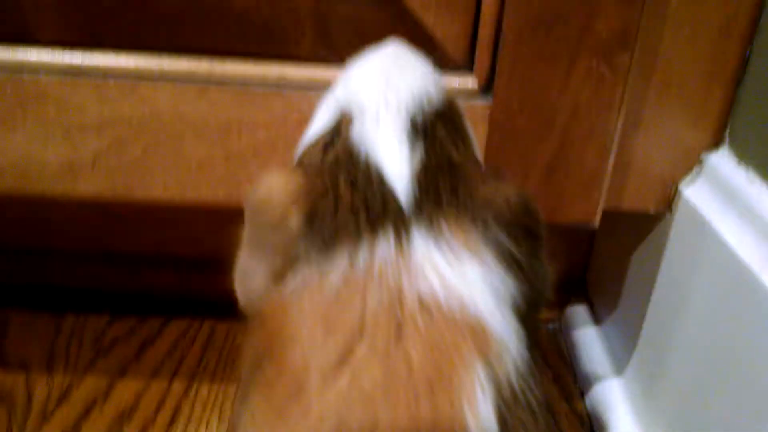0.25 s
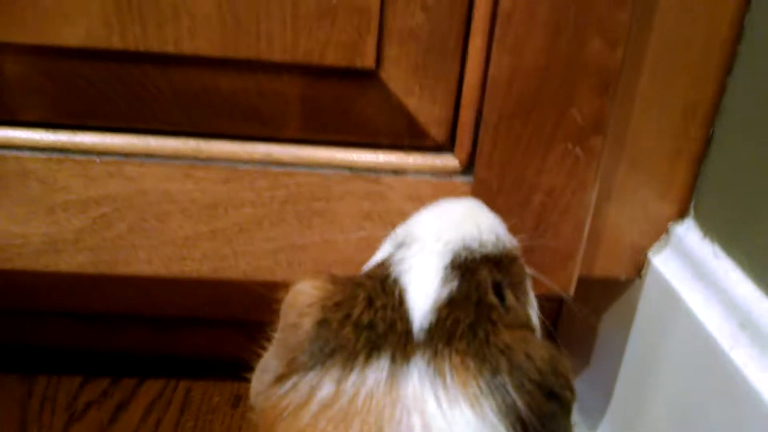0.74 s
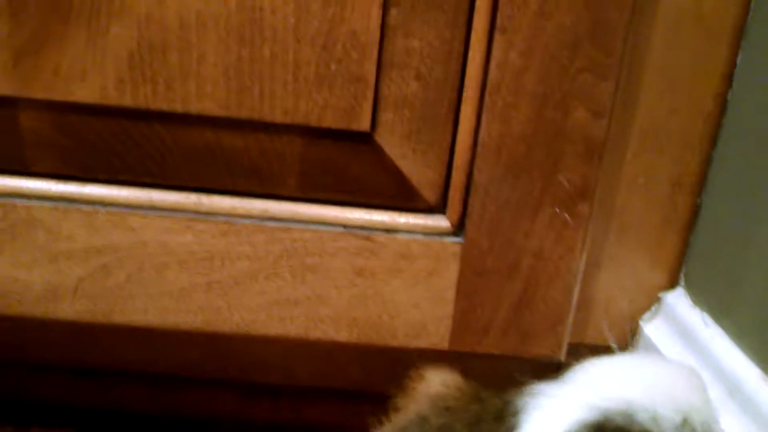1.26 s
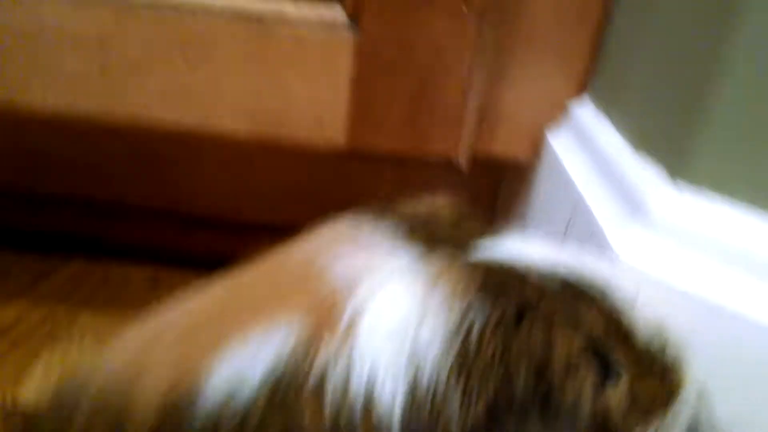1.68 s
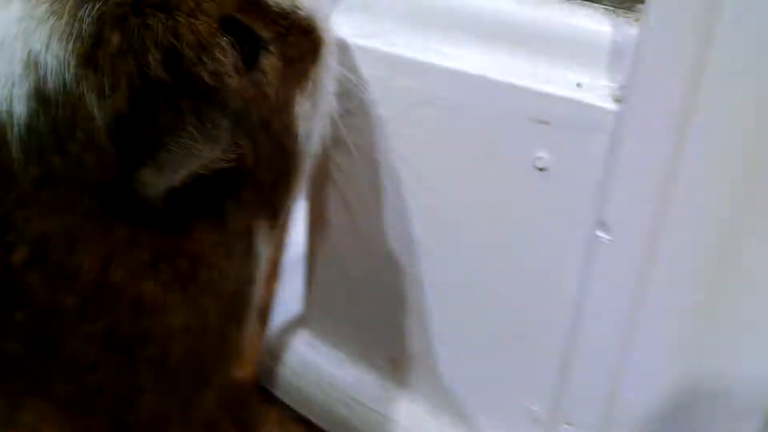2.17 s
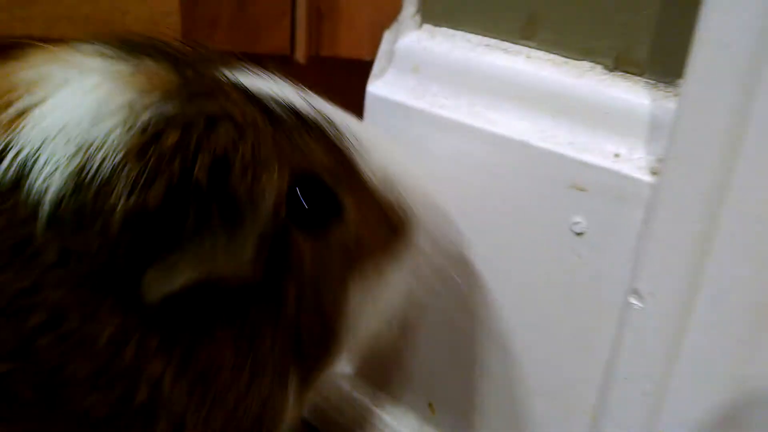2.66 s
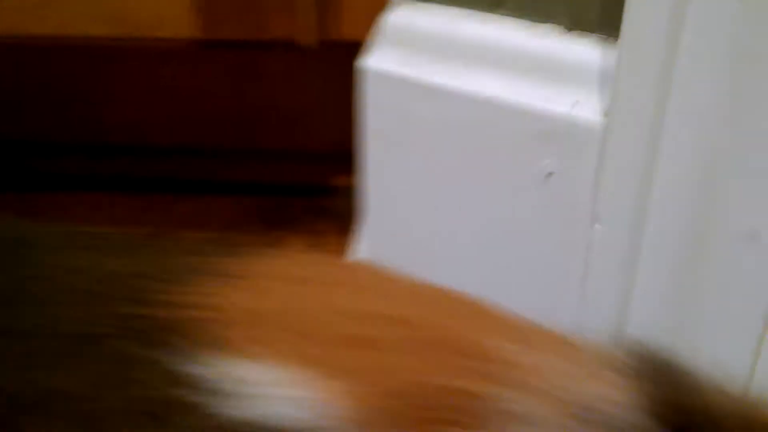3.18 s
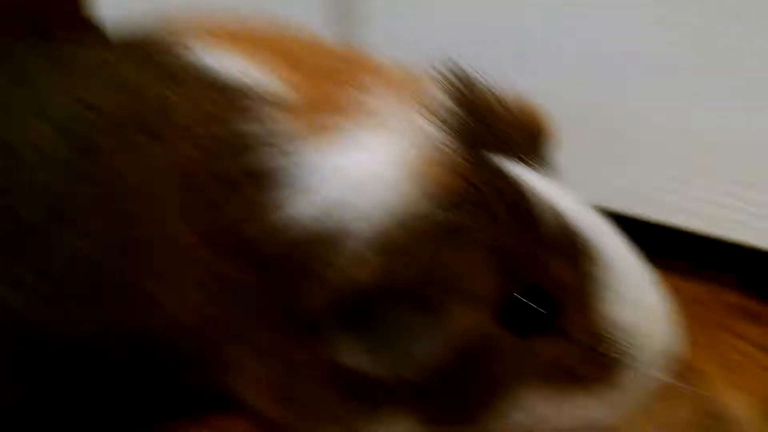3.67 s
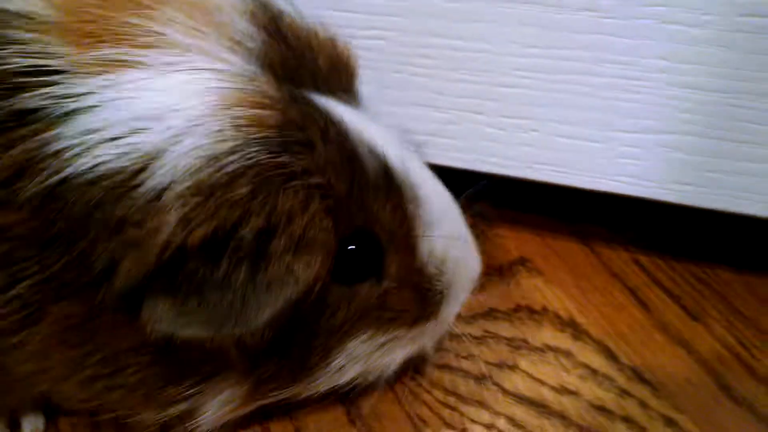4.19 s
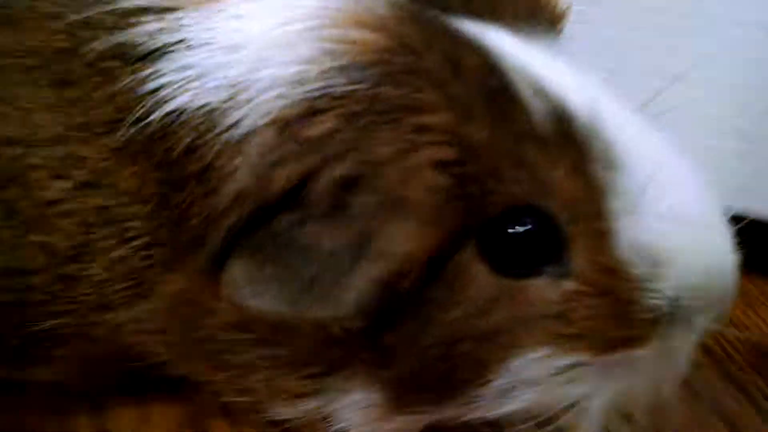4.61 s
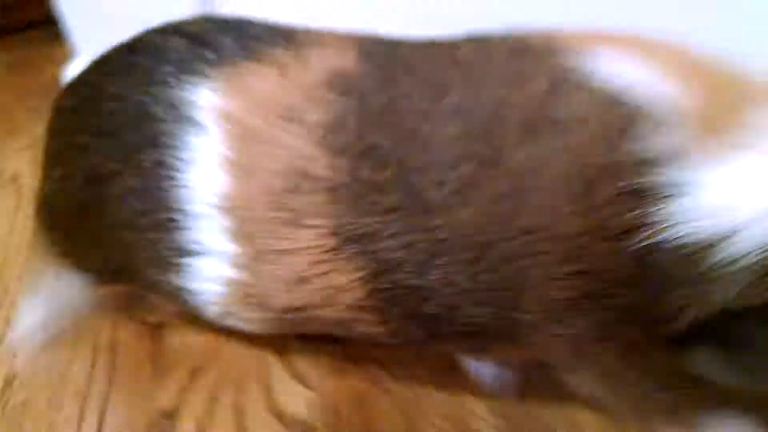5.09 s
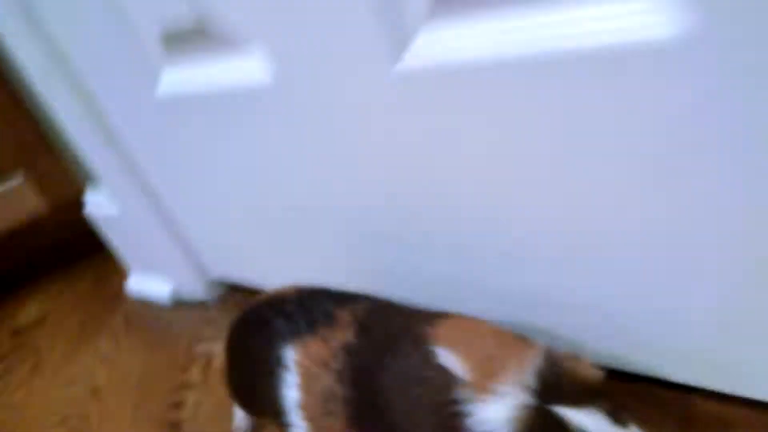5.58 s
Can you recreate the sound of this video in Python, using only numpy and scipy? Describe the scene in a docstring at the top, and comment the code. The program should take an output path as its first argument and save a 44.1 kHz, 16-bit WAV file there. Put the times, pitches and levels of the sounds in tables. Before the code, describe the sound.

A guinea pig noses about a kitchen corner, heard close on a handheld microphone. Over a low refrigerator hum and faint hiss come isolated claw ticks and three tiny squeaks, then a flurry of light scratches with a fourth, stronger squeak. After sparse clicks it trots away, claws pattering, feet thudding softly and fur brushing the door.

```python
"""A guinea pig noses about a kitchen corner, squeaks four times and trots off over the wooden floor.
Claws are ticks of ringing noise, feet damped swings, paws and coat scratchy noise, the door close to the microphones.
Each squeak is a gliding tone with two overtones and a rasp.
A refrigerator hums in the quiet room: unsteady motor orders, a rush of air and a moving hollow resonance."""
import sys
import numpy as np
from scipy import signal
from scipy.fft import rfft, irfft
from scipy.io import wavfile

SR = 44100
rng = np.random.default_rng(int(sys.argv[2]) if len(sys.argv) > 2 else 0)


def output_pcm(signal):
    """Save a mono or channel-first signal as 16-bit PCM at the path in sys.argv[1].

    Samples are clipped to [-1, 1] before scaling.
    """
    pcm = np.clip(np.atleast_2d(signal).T, -1, 1) * 32767
    wavfile.write(sys.argv[1], SR, np.round(pcm).astype(np.int16))


N = 257984

# the clearest claw ticks, before the common claw gain:
# (time [s], level [dB], decay [ms], tilt [dB per octave above 1200 Hz], ringing pitch [Hz])
CLAW_TICKS = [ (0.166, -43.5, 2.3, -8, 1500), (0.465, -30.5, 0.54, -7, 2560), (0.47, -43, 0.52, -20, 2190),
              (1.093, -57, 1.5, 2, 7500), (1.7466, -36, 0.76, -4, 1070), (1.75, -33, 0.6, -1, 1100),
              (1.7516, -42, 2.3, 2, 6500), (2.953, -44, 2.4, -2, 7000), (2.961, -46, 1.2, -6, 4000),
              (3.012, -32, 1.15, 0.5, 4120), (3.018, -46, 1.3, 0, 4500), (3.103, -48, 1.2, -6, 4400),
              (3.118, -45, 1.5, -6, 5200), (3.127, -48, 1.5, 0, 6000), (3.158, -50, 1.2, 0, 5400),
              (3.168, -45, 1.7, 1, 5030), (3.182, -41.5, 1.4, 5, 5160), (3.198, -46, .8, -2, 5200),
              (3.2775, -32, 1.2, -1, 13100), (3.317, -42, 1.5, 1, 6300), (3.34, -42, 2, -2, 6060),
              (3.348, -45, 1.5, 1, 8200), (3.365, -46, .8, 0, 8000), (3.3935, -44, 0.83, 0, 9000),
              (3.3884, -45, 2.4, -2.5, 8500), (4.01, -39.5, 2.4, 0.5, 5850),
              (4.1555, -31.5, 1.8, -1.5, 5000), (4.1584, -37, 1.4, -2, 5300),
              (4.2611, -37.5, 1.34, 0, 4150), (4.426, -46, 3.8, 5, 4340), (4.4727, -39, 1.8, -5.5, 11900),
              (4.493, -40, 4, 3, 4200), (4.4986, -31.5, 3.1, -4, 4170), (4.501, -30, 2.2, -2.5, 4180),
              (4.508, -34, 1.1, 0, 5240), (4.5105, -33.5, 4.7, 1, 4200), (4.615, -30, 0.78, -0.5, 9400),
              (4.631, -38, 0.67, -4, 6600), (4.742, -45, 1.2, -8, 4500), (4.753, -43, 1.5, -9, 5500),
              (4.761, -42, 1.5, 1, 5000), (4.8357, -36, 1.2, 2, 5700), (4.988, -30, 1.8, 0.5, 6700),
              (5.1772, -39.5, 0.91, -8, 1500), (5.2142, -28, 2.2, -6, 2440), (5.223, -35.5, 3.6, 3, 4200),
              (5.238, -37, .8, -4, 9000), (5.2563, -37, 2, 0, 8140), (5.278, -35, 1.2, -6.5, 1190),
              (5.321, -39, 1.1, -17, 1290), (5.327, -27.5, 2, 6, 5640), (5.353, -37, 2.5, 10, 12500),
              (5.402, -38, 3.3, 2, 5500), (5.51, -27, 0.8, -10, 1600), (5.5986, -25.5, 0.83, 1, 5570),
              (5.673, -35, 2.5, 18, 8050), (5.717, -38.5, 5.3, -3.5, 5530), (5.789, -39, 1.5, 12, 11800),
              (5.822, -24, 1.0, 2, 4650)]
# the coat sliding along the door: (time [s], level [dB])
COAT_LEVEL = [(0, -63), (2.9, -63.5), (3.2, -58.5), (3.5, -60.5), (4.4, -59), (4.8, -49), (5.17, -49),
              (5.42, -39), (5.62, -46.5), (5.85, -45.5)]
EDGE_HZ = 15750  # upper edge of the recorder's band


def amp(db):
    """Decibels to a linear gain."""
    return 10 ** (np.asarray(db) / 20)


def evened(x):
    """The sound scaled to an RMS of one."""
    return x / np.sqrt(np.mean(x ** 2) + 1e-20)


def read(points, hz):
    """A table of (frequency [Hz], value) joined on a log-frequency axis."""
    f, value = np.transpose(points)
    return np.interp(np.log(hz + 1), np.log(f + 1), value)


def curve(rows):
    """Rows of (time [s], value) joined by straight lines."""
    return np.interp(np.arange(N) / SR, *np.transpose(rows))


def add(mix, s, sound):
    """Lay a sound into the mix at s seconds, cut off at the end."""
    part = mix[:, round(s * SR):][:, :sound.shape[-1]]
    part += sound[..., :part.shape[1]]


def pan(db):
    """Left and right gains for a left-minus-right level difference."""
    return amp(np.array([[.5], [-.5]]) * db)


def hump(hz, centre_hz, octaves):
    """A bell on the log-frequency axis."""
    return np.exp(-.5 * (np.log2((hz + 1) / centre_hz) / octaves) ** 2)


def drift(rate):
    """Slow random wander of unit RMS, mostly below rate [Hz]."""
    hz = np.fft.rfftfreq(N, 1 / SR)
    spectrum = rfft(rng.standard_normal(N)) * np.exp(-(hz / rate) ** 2)
    spectrum[0] = 0
    return evened(irfft(spectrum, N))


def spread(pair):
    """Two unrelated signals become left and right spectra, by turns more and less alike up the treble."""
    # likeness of the two microphones: (frequency [Hz], correlation)
    likeness = [(60, 0.85), (130, 0.62), (300, 0.96), (550, 0.53), (800, 0.37), (1500, 0.52), (2300, 0.028)]
    # depth of the ripple in that likeness: (frequency [Hz], depth)
    widening = [(500, 0.22), (1100, 0.5), (1500, 0.58), (3100, 1), (4600, 0.72), (9300, 0.41),
                (12400, 0.93), (14000, 0.62)]
    crossfeed_s, left_lead_s = .000325, .000033
    hz = np.fft.rfftfreq(pair.shape[1], 1 / SR)
    right, other = rfft(pair)
    ripple = read(widening, hz) * np.cos(2 * np.pi * hz * crossfeed_s)
    same = np.clip(read(likeness, hz) - ripple, -1, 1)
    left = same * right + np.sqrt(1 - same ** 2) * other
    left = left * np.exp(2j * np.pi * hz * left_lead_s)
    return np.array([left, right])


def noise(size, colour):
    """Coloured noise at the two microphones."""
    spectra = spread(rng.standard_normal((2, size)))
    return evened(irfft(spectra * colour(np.fft.rfftfreq(size, 1 / SR)), size))


def crackle(size, per_s, strength, decay):
    """A steady level broken by tiny snaps at random moments, each dying away over decay [s]."""
    snaps = (rng.random(size) < per_s / SR) * np.minimum(rng.exponential(1, size), 3)
    tails = signal.lfilter([1], [1, -np.exp(-1 / (decay * SR))], snaps)
    return evened(1 + strength * tails)


def resonate(x, hz, width_hz):
    """A resonance that follows the curve hz: shift down to zero, smooth twice, shift back."""
    turn = np.exp(2j * np.pi * np.cumsum(hz) / SR)
    r = np.exp(-np.pi * width_hz / SR)
    smoothed = signal.lfilter([1], np.poly([r, r]), x / turn)
    return evened((turn * smoothed).real)


def motor(hz, orders, slip, waver, left_phase):
    """Orders of a slightly unsteady shaft; the higher ones waver more and differ more between the microphones."""
    phase = 2 * np.pi * np.cumsum(hz * (1 + slip * drift(1.78))) / SR
    offset = np.array([[left_phase], [0]])  # radians at left and right
    tone = np.zeros((2, N))
    for order, db in orders:
        order = round(order)
        depth = waver * np.log2(order + 1)
        path = 1 + depth * np.array([drift(4.8) + 1j * drift(4.3) for _ in range(2)])
        turn = np.exp(1j * (order * phase + rng.uniform(0, 2 * np.pi) + offset))
        tone += amp(db) * (path * turn).real / np.sqrt(.5 + depth ** 2)
    return tone


def refrigerator(air_db=-52.5, air_follows=0.27, fan_follows=2.08, air_waver_db=0.5, left_phase=1.28):
    """Two motors and a lone tone in a rush of air, louder as the microphones come nearer."""
    # motor orders before nearness and pan: (order [multiple of the shaft rate], level [dB])
    compressor_orders = [(1, -52), (4, -63.5), (5, -63), (6, -62), (8, -71)]
    fan_orders = [(1, -64.5), (2, -62.5), (3, -62.5), (4, -56.5), (5, -63.5), (8, -61.5), (10, -62.5)]
    # nearness to the refrigerator: (time [s], gain [dB])
    nearness = [(0, 1), (1, -1.5), (2, 0.5), (2.8, -0.5), (3.6, 1.5), (5, 2), (5.85, 2.5)]
    # colour of the rushing air: (frequency [Hz], gain [dB])
    air_colour = [(20, -8), (42, -26), (75, -13), (105, 4), (140, -7), (200, -0.5), (320, -3.5), (420, -7),
                  (540, -8), (700, -10.5), (1000, -15), (2000, -25), (2800, -26.5), (4500, -64)]
    # hollow resonance that the corner gives the drone, shifting as the microphones move:
    # (time [s], level before pan [dB], centre [Hz])
    hollow_path = [(0, -66, 377), (1.7, -62.5, 420), (2.1, -52, 480), (2.8, -54.5, 500), (3.7, -50.5, 312),
                   (4.9, -48.5, 236), (5.85, -58.5, 204)]
    compressor_hz, fan_hz, buzz_hz = 59.2, 52.95, 323.6
    buzz_db = -56  # before nearness and pan

    near_db = curve(nearness)
    hum = motor(compressor_hz, compressor_orders, slip=0.0025, waver=0.13, left_phase=left_phase)
    hum += motor(buzz_hz, [(1, buzz_db)], slip=0.0041, waver=1.0, left_phase=left_phase)
    fan = motor(fan_hz, fan_orders, slip=0.00435, waver=0.17, left_phase=left_phase)
    fan = amp(fan_follows * near_db) * fan  # follows: dB per dB of nearness
    air_level_db = air_db + air_follows * near_db + air_waver_db * drift(1.7)
    air = amp(air_level_db) * noise(N, lambda hz: amp(read(air_colour, hz)))
    hollow_db, hollow_hz = (curve(np.array(hollow_path)[:, [0, k]]) for k in (1, 2))
    murmur = noise(N, lambda hz: hump(hz, centre_hz=337, octaves=0.7))
    hollow = amp(hollow_db) * resonate(murmur, hollow_hz, width_hz=320)
    return pan(-2.86) * (amp(near_db) * hum + fan + air + hollow)


def hiss(db=-63.0):
    """The steady hiss of the microphones: coloured noise."""
    # colour of the hiss: (frequency [Hz], gain [dB])
    hiss_colour = [(500, -3), (1500, 7.5), (2400, 2.5), (4200, 2.5), (6500, -1.5), (9800, -2.5),
                   (10600, -8), (15300, -26)]
    return amp(db) * noise(N, lambda hz: amp(read(hiss_colour, hz)))


def handling(db=-60, centre_hz=36, octaves=0.33):
    """The hand-held microphones rumble as they swing round to follow the trot."""
    # (time [s], speed of the swing [0-1])
    swing_speed = [(0, 0.1), (5.3, 0.17), (5.55, 0.8), (5.85, 0.6)]
    return amp(db) * curve(swing_speed) * noise(N, lambda hz: hump(hz, centre_hz, octaves))


def rustle(grain_db=0.6, rough_db=1.5, count=6):
    """Fur hisses along the door, rough and unsteady, with tiny snaps."""
    # colour of the fur: (frequency [Hz], gain [dB])
    coat_colour = [(600, 3.5), (1500, -0.5), (2400, 0.5), (3100, -4.5), (4200, 2.5), (6500, 1), (9800, 1),
                   (13000, -1.5), (15500, -0.5)]
    snaps = crackle(N, per_s=90, strength=0.6, decay=0.0011)
    hz = np.fft.rfftfreq(N, 1 / SR)
    fur = rfft(noise(N, lambda hz: amp(read(coat_colour, hz))))
    place = np.minimum(hz / EDGE_HZ, 1) * (count - 1)
    rough = np.zeros((2, N))
    for k in range(count):
        band = irfft(fur * np.maximum(1 - abs(place - k), 0), N)  # overlapping triangular bands
        rough += band * amp(rough_db * drift(90))
    return amp(curve(COAT_LEVEL) + grain_db * drift(61)) * snaps * evened(rough)


def claw(s, db, decay_ms, tilt_db, ring_hz, ring_db=7, rise_ms=0.15, touch=0.036, size=2048):
    """A claw tip grazes the varnish, then snaps onto it: brief chatter with one stronger resonance."""
    # colour of claw on varnish: (frequency [Hz], gain [dB])
    varnish_colour = [(300, -58), (1000, -5), (1600, -1.5), (3000, 3.5), (4200, 8), (7000, 5.5), (10000, 6),
                      (14000, -0.5), (16000, -8.5)]
    lead = size // 8  # samples of grazing before the snap
    ms = (np.arange(size) - lead) * 1000 / SR
    after = np.maximum(ms, 0)
    hz = np.fft.rfftfreq(size, 1 / SR)
    snap = (1 - np.exp(-after / rise_ms)) * np.exp(-after / decay_ms)
    graze = touch * np.exp(-abs(ms) / 2.0)
    envelope = snap / snap.max() + graze
    chatter = spread(rng.standard_normal((2, size)) * envelope)
    tilt = tilt_db * np.log2(np.maximum(hz / 1200, 1))
    colour_db = read(varnish_colour, hz) + tilt + ring_db * hump(hz, ring_hz, 0.12)
    tick = evened(irfft(chatter * amp(colour_db), size))
    return s - lead / SR, amp(db) * tick * np.sqrt(np.mean(envelope ** 2))


def floor_echoes():
    """Rows of fainter ticks: the floor throws back each clear tick."""
    echo_db, decay_ms = -14, 0.51  # level against the clear tick
    lags = rng.uniform(0.0033, 0.0073, len(CLAW_TICKS))  # seconds
    return [(s + lag, db + echo_db, decay_ms, tilt_db, ring_hz)
            for (s, db, _, tilt_db, ring_hz), lag in zip(CLAW_TICKS, lags)]


def bump(s, db, decay, centre_hz, octaves):
    """A knock sets the woodwork ringing: a cluster of close panel resonances dies away."""
    t = np.arange(SR // 2) / SR
    ringing = noise(len(t), lambda hz: hump(hz, centre_hz, octaves))
    return s, amp(db) * ringing * np.exp(-t / decay) * (1 - np.exp(-t / 0.001))


def thud(s, db, hz, swell_s, pan_db):
    """A soft foot pushes a floorboard: a quick push gives a broad knock, a slow one a few round swings."""
    t = np.arange(SR // 5) / SR
    push = (t / swell_s * np.exp(1 - t / swell_s)) ** 2
    return s, -amp(db) * pan(pan_db) * push * np.sin(2 * np.pi * hz * t)


def squeak(s, length, db, first_hz, top_hz, end_hz, glide_s, swell_db, catch_db, catch_s, release_s,
           overtones_db, tilt_db, pan_db, pop_db, rasp_db):
    """A brief note glides, then turns; hoarse until the pitch settles, its overtones fade first as it closes."""
    # resonances of the throat, applied to the overtones: (frequency [Hz], gain [dB])
    throat_colour = [(600, 0), (900, -5.5), (1400, -2.5), (2100, -11.5), (2350, -17), (2700, -12.5)]
    attack_s, pop_s, catch_width_s = 0.002, 0.003, 0.0025
    turn_at = 0.46  # share of the note before the last turn of pitch
    jitter, shimmer_db = .02, .4
    settled = .2  # hoarseness left once the glide is over
    t = np.arange(0, length, 1 / SR)
    progress = t / length

    glide = np.sin(np.pi / 2 * np.minimum(t / glide_s, 1)) ** 2
    turn = np.maximum((progress - turn_at) / (1 - turn_at), 0) ** 2
    hz = first_hz + (top_hz - first_hz) * glide + (end_hz - top_hz) * turn
    hoarse = 1 + (settled - 1) * glide
    phase = 2 * np.pi * np.cumsum(hz * (1 + jitter * hoarse * drift(300)[:len(t)])) / SR

    pop = pop_db * np.exp(-(t / pop_s - 1) ** 2)
    catch = catch_db * np.exp(-.5 * ((t - catch_s) / catch_width_s) ** 2)  # a brief dip
    gate = np.minimum(t / attack_s, 1) * np.minimum((length - t) / release_s, 1)
    shimmer = shimmer_db * drift(150)[:len(t)]
    effort = gate * amp(swell_db * (progress - .5) + pop - catch + shimmer)

    overtones = np.zeros(len(t))
    for k in (2, 3):
        overtone_db = read(throat_colour, k * hz) + overtones_db + tilt_db * (k - 2.0)
        overtones += amp(overtone_db) * np.sin(k * phase)
    breath = noise(len(t), lambda f: hump(f, centre_hz=950, octaves=1.0))
    rasp = amp(rasp_db) * hoarse * (1 + np.cos(phase)) * breath  # pulses with the note
    voice = np.sqrt(2) * (np.sin(phase) + gate * overtones) + rasp
    return s, amp(db) * effort * voice * pan(pan_db)


def scuff(s, length, db, centre_hz, octaves, grain_db=1.0, grain_hz=260, skirt=0.048):
    """Hairs and pads catch and slip: scratchy noise that swells and fades; a narrow band rings like the door."""
    size = int(length * SR)
    grain = amp(grain_db * drift(grain_hz)[:size])
    stroke = np.sqrt(np.hanning(size)) * grain * crackle(size, per_s=240, strength=0.65, decay=.0006)
    hz = np.fft.rfftfreq(size, 1 / SR)
    colour = hump(hz, centre_hz, octaves) + skirt * hump(hz, centre_hz, 3 * octaves)
    scratch = spread(stroke * rng.standard_normal((2, size)))
    return s, amp(db) * evened(irfft(scratch * colour, size))


def patter(count=34):
    """Rows of light, uneven claw ticks at random during the trot, at levels close to the coat's rustle."""
    start_s, end_s = 4.72, 5.84
    offset_db, spread_db = -1.5, 2.5  # against the rustle, before the common claw gain
    decay_ms, tilt_db = 1, -2
    chance = rng.random((count, 3))
    times = start_s + (end_s - start_s) * (np.arange(count) + chance[:, 0]) / count
    coat_db = np.interp(times, *np.transpose(COAT_LEVEL))
    levels = coat_db + offset_db + spread_db * (2 * chance[:, 1] - 1)
    rings = np.interp(chance[:, 2], [0, 1], [3800, 9500])  # Hz
    return [(s, db, decay_ms, tilt_db, hz) for s, db, hz in zip(times, levels, rings)]


def corner(x, near_db=-8.0, near_decay=0.023, room_db=-18, room_decay=0.041, dull_hz=2500):
    """Quick reflections from floor and cabinet, then the faint tail of the kitchen; both lose treble."""
    t = np.arange(SR // 2) / SR
    taps = rng.standard_normal((2, len(t))) * (t > .001)
    response = np.zeros((2, len(t)))
    for db, decay in ((near_db, near_decay), (room_db, room_decay)):
        tail = taps * np.exp(-t / decay)
        response += amp(db) * tail / np.linalg.norm(tail[0])
    response = signal.lfilter(*signal.butter(1, dull_hz, fs=SR), response)
    return signal.fftconvolve(x, response, axes=1)[:, :N]


def scene(claws_db=1):
    """The animal in its corner, over the sound of the room."""
    # bumps on the woodwork: (time [s], level [dB], decay [s], centre [Hz], width [octaves])
    bump_rows = [(0.465, -43, 0.0012, 1400, 0.44), (3.569, -38.5, 0.0031, 1200, 0.42),
                 (4.156, -47.5, 0.0085, 1760, 0.12), (4.5, -36, 0.009, 4100, 0.046),
                 (4.501, -40.5, 0.016, 1930, 0.19), (5.2144, -29, 0.004, 2300, 0.31),
                 (5.219, -42, 0.0059, 1200, 0.42), (5.222, -44, 0.023, 397, 0.36),
                 (5.218, -47, 0.12, 1200, 1), (5.328, -38, 0.0026, 1700, 0.99),
                 (5.345, -40.5, 0.045, 340, 0.39), (5.508, -29.5, 0.0014, 1520, 0.2),
                 (5.509, -27, 0.0023, 680, 0.2), (5.512, -40, 0.06, 1640, 0.45),
                 (5.518, -43, 0.038, 680, 0.23), (5.822, -33.5, 0.0029, 1740, 0.2)]
    # footfalls on the boards: (time [s], level [dB], pitch [Hz], swell [s], left minus right [dB])
    thud_rows = [(1.0936, -39.5, 1080, 0.00055, 0), (2.809, -36, 845, 0.00061, 0),
                 (2.861, -41, 950, .0008, 0), (2.944, -48, 1300, .0008, -2),
                 (3.1677, -30.5, 596, 0.00038, -1), (3.168, -38.5, 290, 0.0044, 4),
                 (3.568, -40, 700, .0006, -8), (3.877, -41, 91.5, .008, -9), (3.896, -42, 126, 0.0092, 4),
                 (5.2133, -29.5, 420, 0.0028, -15), (5.2983, -32, 286, 0.0011, -14),
                 (5.303, -37, 240, .008, 3), (5.3481, -27.5, 336, 0.0018, -12),
                 (5.3549, -27.5, 233, 0.0061, 4), (5.3735, -32, 380, 0.0025, -12),
                 (5.376, -36, 200, 0.0075, -8), (5.385, -33, 86, 0.009, -3), (5.403, -37, 170, .002, -6),
                 (5.528, -50, 152, 0.006, -3), (5.645, -59, 150, 0.0051, -3), (5.784, -48, 162, 0.0089, -3),
                 (5.815, -48, 150, 0.0089, -3)]
    # squeaks: (time [s], length [s], level [dB], first pitch [Hz], top pitch [Hz], last pitch [Hz],
    # glide [s], swell [dB], catch depth [dB], catch after [s], release [s], overtones [dB],
    # tilt [dB per overtone], left minus right [dB], pop [dB], rasp [dB])
    squeak_rows = [(1.286, 0.046, -36, 581, 762, 755, 0.025, 5, 16, .006, 0.0042, -3.5, -3, -5.5, 3, -26),
                   (1.5452, 0.043, -38, 576, 680, 780, 0.015, -2.5, 6, 0.0046, 0.017, -1, -3.5, -2.5, 3.5, -16),
                   (1.6305, 0.027, -39.5, 479, 724, 650, 0.0192, 7, 2, 0.0046, 0.0076, 0, -3, -3, -1, -12),
                   (3.2889, 0.0385, -31.2, 447, 908, 865, 0.0097, 9, 10, 0.01, 0.0028, -15.5, -0.5, -6.5, 3, -22)]
    # paws sliding, fur brushing, and a low ringing of the door:
    # (time [s], length [s], level [dB], centre [Hz], width [octaves])
    scuff_rows = [ (2.792, 0.28, -63, 940, 0.3), (2.938, 0.031, -54.5, 7000, 0.41),
                  (3.042, 0.059, -53, 13100, 1.5), (3.088, 0.056, -50.5, 5640, 1.7),
                  (3.133, 0.068, -63, 5420, 0.06), (3.293, 0.086, -51.5, 7040, 0.53),
                  (3.363, 0.04, -51.5, 8900, 1.5), (3.56, 0.045, -56, 1070, 0.52),
                  (3.631, 0.021, -53.5, 7060, 1.4), (3.897, 0.062, -52.5, 7950, 0.9),
                  (4.138, 0.043, -47.5, 4960, 0.44), (4.73, 0.048, -45, 5800, 1.5),
                  (4.887, 0.036, -52, 4540, 1.5), (5.059, 0.088, -56.5, 8000, 0.66),
                  (5.193, 0.039, -44, 5340, 0.36), (5.31, 0.034, -44.5, 1280, 1.7),
                  (5.504, 0.037, -49, 5000, 0.46), (5.557, 0.092, -50, 1600, 1),
                  (5.6, 0.16, -54.5, 1400, 1.1), (5.615, 0.19, -54, 560, 0.11),
                  (5.668, 0.024, -49.5, 6450, .6)]

    feet, voice = np.zeros((2, 2, N))
    claw_rows = CLAW_TICKS + floor_echoes() + patter()
    for row in claw_rows:
        s, tick = claw(*row)
        add(feet, s, amp(claws_db) * tick)
    for source, rows in ((bump, bump_rows), (thud, thud_rows), (scuff, scuff_rows)):
        for row in rows:
            add(feet, *source(*row))
    for row in squeak_rows:
        add(voice, *squeak(*row))
    voice_echo = corner(voice, near_db=-18, near_decay=.008, room_db=-4.5, room_decay=0.06)
    echoes = corner(feet) + amp(-11.5) * voice_echo
    return feet + voice + echoes + rustle() + refrigerator() + handling() + hiss()


def record(dry):
    """The recorder's band limit: a steep low-pass filter."""
    low_pass = signal.firwin(255, EDGE_HZ, window=("kaiser", 9), fs=SR)
    return signal.oaconvolve(dry, low_pass[None], "same")


dry = scene()
out = record(dry)
output_pcm(out)
```